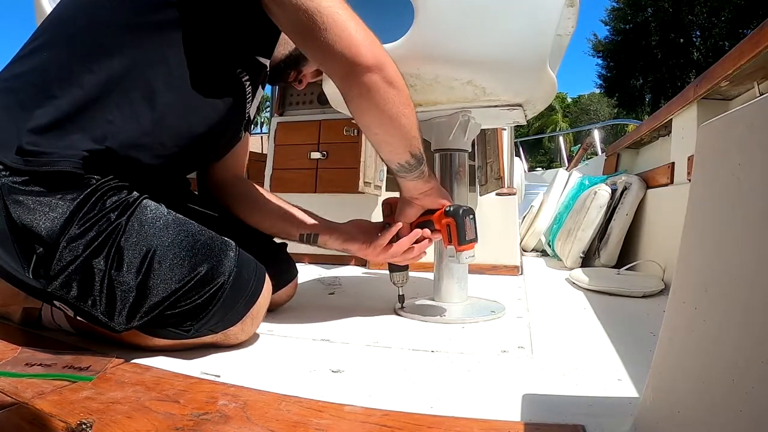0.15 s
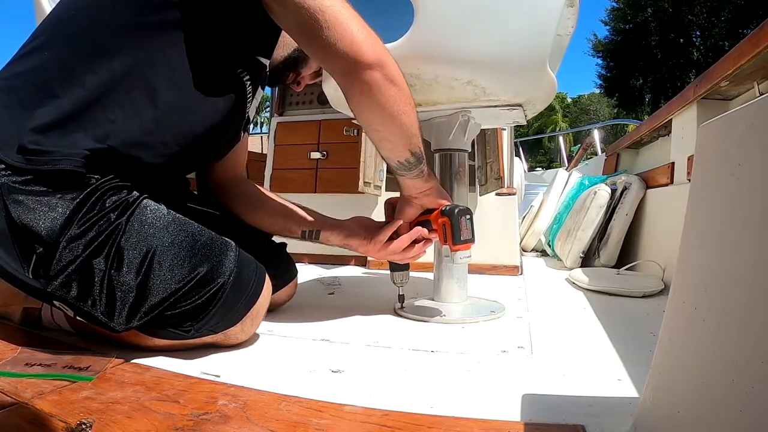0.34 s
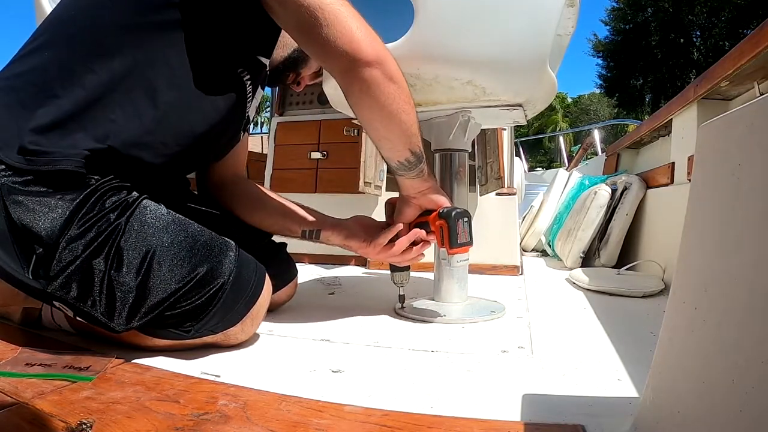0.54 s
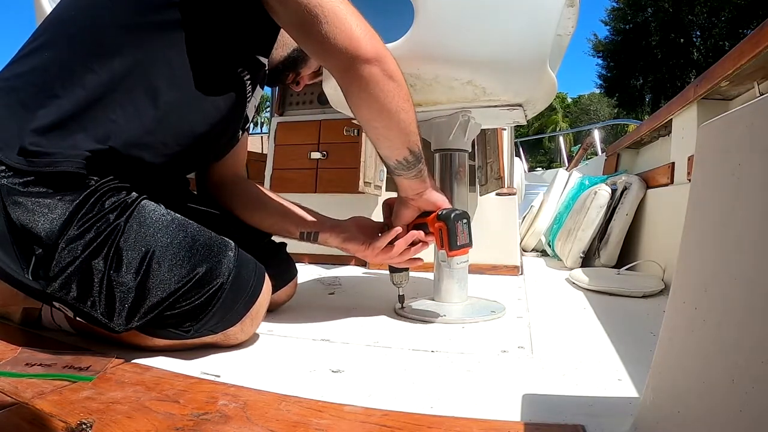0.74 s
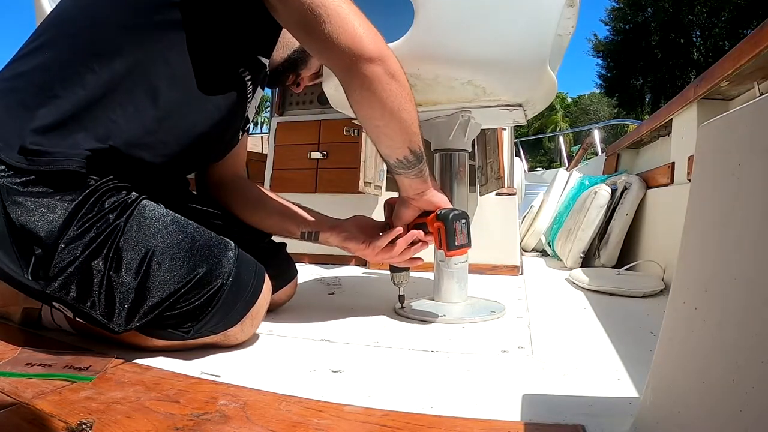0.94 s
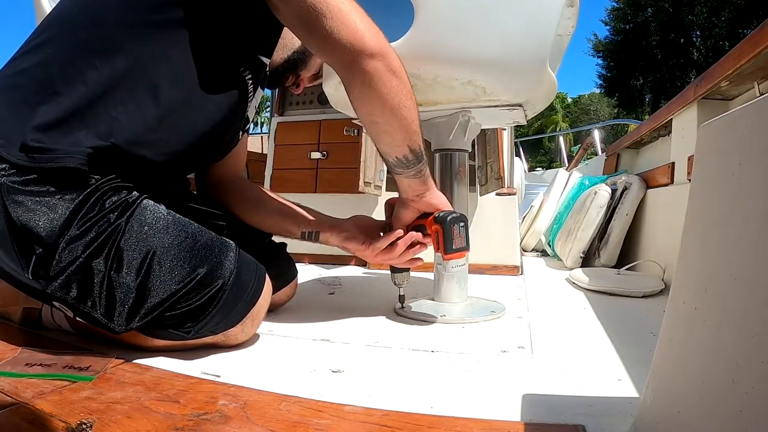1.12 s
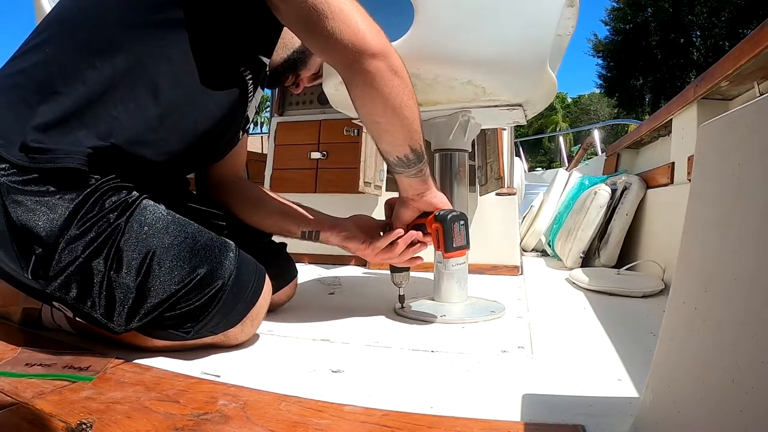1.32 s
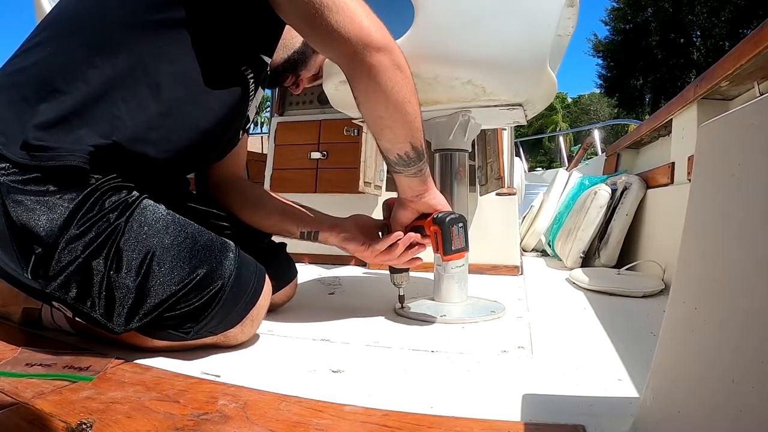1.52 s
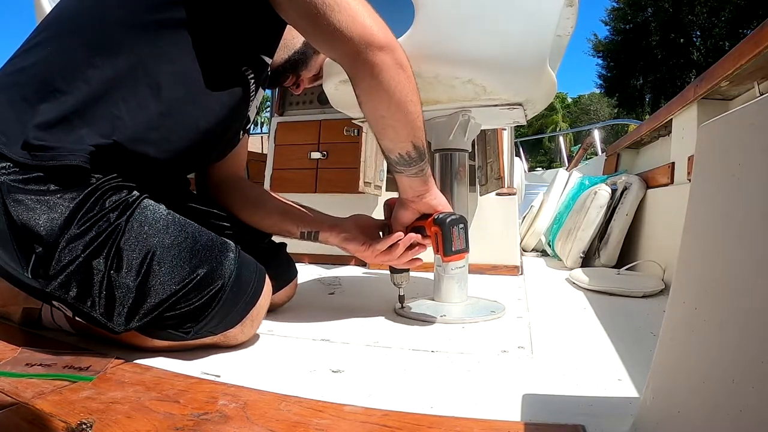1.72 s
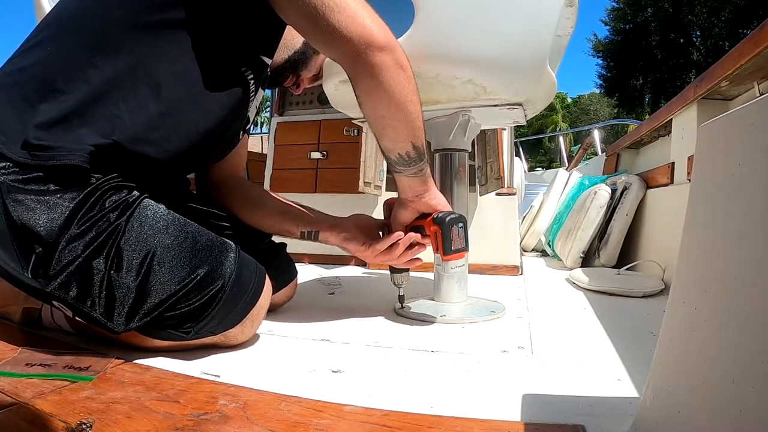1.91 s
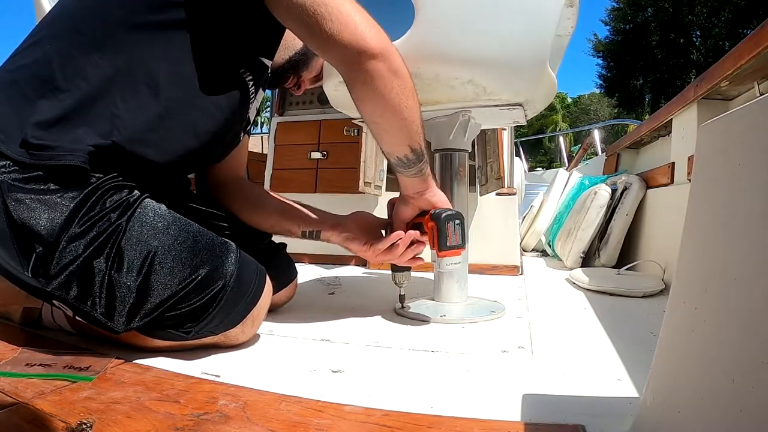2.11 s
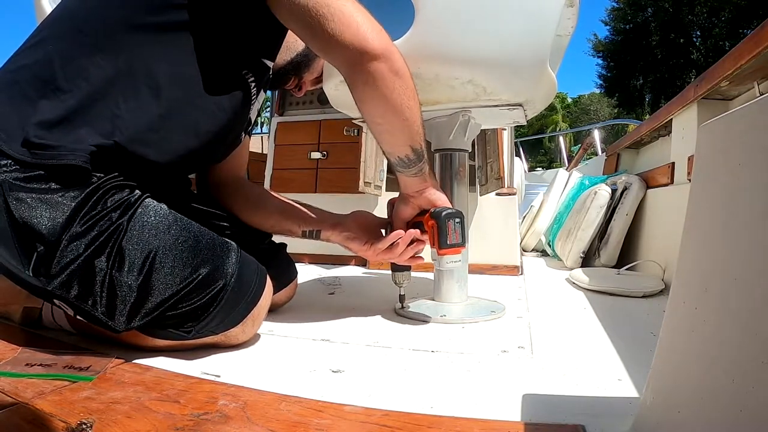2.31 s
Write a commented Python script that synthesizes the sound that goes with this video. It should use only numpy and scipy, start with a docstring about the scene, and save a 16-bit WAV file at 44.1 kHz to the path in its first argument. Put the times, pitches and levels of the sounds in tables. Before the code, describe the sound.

Close stereo pickup on an open boat deck: faint trigger clicks, a short harsh drill burst, a brief gap with clicks, then a longer steady grinding burst, ending in short echo and quiet low rumble.

```python
"""On a boat deck by the cockpit, a cordless drill runs on screws close by: a short burst, then a long one.
The trigger clicks and the motor whines as the first burst starts; the bit catches eight times a turn.
Each catch is a noise scrape; spindle partials and plate resonances make the deck boom, growl and ring.
Deck modes hum on after each stop, decaying noise echoes in the cockpit, and low noise rumbles outdoors."""
import sys
import numpy as np
from scipy import signal
from scipy.fft import rfft, irfft, next_fast_len
from scipy.io import wavfile
from scipy.ndimage import uniform_filter1d, map_coordinates

SR = 44100
rng = np.random.default_rng(int(sys.argv[2]) if len(sys.argv) > 2 else 0)


def put_to_file(sound):
    """Save the sound as 16-bit audio at rate SR, in the file named by the first command-line argument."""
    columns = np.atleast_2d(sound).T  # one column per channel
    safe = np.clip(columns, -1, 1)
    whole_steps = np.round(safe * 32767)
    wavfile.write(sys.argv[1], SR, whole_steps.astype(np.int16))


N = 103635


def amp(db):
    """Level: decibels as an amplitude ratio."""
    return 10 ** (np.asarray(db) / 20)


def unit(x):
    """Normalisation: scale to rms 1."""
    return x / np.sqrt(np.mean(x ** 2) + 1e-20)


def clock():
    """Sampling: the time of each sample in seconds."""
    return np.arange(N) / SR


def along(points, hz):
    """Logarithmic frequency scale: interpolate (Hz, value) points at hz."""
    f, v = np.transpose(points)
    return np.interp(np.log(hz + 1), np.log(f + 1), v)


def over_time(points):
    """Slow control: interpolate (second, value) points at each sample."""
    return np.interp(clock(), *np.transpose(points))


def wobble(rate):
    """Random modulation: a smooth curve through random knots, rate knots a second."""
    return map_coordinates(rng.standard_normal(400), [clock() * rate], mode="wrap")


def filtered(x, response):
    """Linear filtering: multiply the spectrum of x by a complex response of frequency."""
    m = next_fast_len(N + SR // 2)
    spectrum = rfft(x, m) * response(np.fft.rfftfreq(m, 1 / SR))
    return irfft(spectrum, m)[..., :N]


def coloured(x, spectrum):
    """Minimum phase: a causal filter of unit power gain, its shape found by folding the cepstrum."""
    size = 2 ** 13
    cepstrum = irfft(np.log(amp(along(spectrum, np.fft.rfftfreq(size, 1 / SR)))))
    cepstrum[1:size // 2] *= 2
    cepstrum[size // 2 + 1:] = 0
    impulse_response = irfft(np.exp(rfft(cepstrum)))
    impulse_response /= np.linalg.norm(impulse_response)
    return signal.fftconvolve(x, impulse_response[None], axes=1)[:, :N]


def white():
    """White noise: two unrelated signals of equal power at every frequency."""
    return rng.standard_normal((2, N))


# Coherence of left and right. Each row: frequency in Hz, likeness from 0 to 1.
COHERENCE = [(25, .85), (60, 0.99), (250, 0.92), (500, 0.76), (1000, 0.63), (2000, 0.64), (4000, 0.66),
             (8000, 0.2), (14000, 0.13)]


def spread(pair):
    """Coherence: mix two unrelated signals to be alike in the bass and less so in the treble."""
    def mid_side(hz):
        turn = np.arccos(np.clip(along(COHERENCE, hz), 0, 1)) / 2
        return np.array([np.cos(turn), np.sin(turn)])
    mid, side = filtered(pair, mid_side)
    return np.array([mid + side, mid - side])


def noise(spectrum):
    """Filtered noise: a stereo pair of rms 1 with the given spectrum."""
    return unit(spread(coloured(white(), spectrum)))


def resonances(modes, hz):
    """Modal sum: damped resonances of (Hz, width Hz, dB) with alternating sign."""
    total = 0
    for k, (centre, width, db) in enumerate(modes):
        damping = 1j * hz * width
        total = total + (-1) ** k * amp(db) * damping / (centre * centre - hz * hz + damping)
    return total


# Catches of the bit in one turn. Each row: share of the turn, relative level in dB at first,
# relative level in dB from DEEP_TURNS on.
CATCHES = [(0, -13, -11), (0.116, -19, -12.5), (0.237, -17.5, -11.5), (0.317, -10, -11.5),
           (0.441, -23.5, -25.5), (0.556, -14, -14), (0.669, -11, -13), (0.902, -16.5, -19.5)]
DEEP_TURNS, CATCH_JITTER_S = 9, .00008


def catches(turns):
    """Periodic excitation: an uneven impulse per catch; the pattern shifts once the screw is deep."""
    place, early_db, deep_db = np.transpose(CATCHES)
    places = np.arange(-30, 40)[:, None] + place
    s = np.interp(places, turns, clock(), left=-1, right=-1)
    s = s + CATCH_JITTER_S * rng.standard_normal(places.shape)
    db = np.where(places < DEEP_TURNS, early_db, deep_db)
    size = amp(db + rng.uniform(-1.95, 1.3, places.shape))
    heard = s > 0
    return np.bincount((s[heard] * SR).astype(int), size[heard], N)[:N]


# Spectrum of the bit and chuck rattling. Each row: frequency in Hz, relative level in dB per Hz.
RATTLE_SPECTRUM = [(500, -16), (1000, -2), (1500, -1), (1720, -1), (1900, -6), (2150, 2), (2350, -4),
                   (2560, 0), (3400, -4), (3850, 0), (4400, -6), (5600, -3.5), (6500, -7.5), (7800, -15),
                   (8700, -9), (10500, -18), (12500, -25), (15700, -44.5)]
CRACK_ATTACK_S, SCRAPE_HOLD_S, CRACK_T60_S = .0005, .002, .009
RATTLE_T60_S, RATTLE_TAIL_DB = .04, -14  # tail level relative to the crack
GRIND_DB, GRIND_TOP_HZ = -17, 7500  # grinding, before the rattle is normalised
RATTLE_PATCHY_DB = 1.5


def rattle(hits):
    """Impact noise: each catch is a scrape with a metallic tail and patchy colour, over steady grinding."""
    t = clock()[:SR // 10]
    crack = amp(-60 * np.maximum(t - SCRAPE_HOLD_S, 0) / CRACK_T60_S)
    tail = amp(RATTLE_TAIL_DB - 60 * t / RATTLE_T60_S)
    attack = 1 - np.exp(-t / CRACK_ATTACK_S)
    power = (crack ** 2 + tail ** 2) * attack ** 2
    # unrelated noises add in power
    envelope = np.sqrt(abs(signal.fftconvolve(hits ** 2, power)[:N]))
    grind = amp(GRIND_DB) * filtered(white(), lambda hz: 1 / np.sqrt(1 + (hz / GRIND_TOP_HZ) ** 4))
    z = signal.stft(white(), nperseg=256)[2]
    # patches of frequency and time, louder or softer
    patches = uniform_filter1d(rng.standard_normal(z.shape[1:]), size=12, axis=0)
    patches = uniform_filter1d(patches, size=4, axis=1)
    grit = signal.istft(z * amp(RATTLE_PATCHY_DB * unit(patches)), nperseg=256)[1][:, :N]
    return spread(coloured(grit * envelope + grind, RATTLE_SPECTRUM))


# Force on the deck. Each row: multiple of the spindle speed, relative level in dB.
ORDERS = [(3, -2), (4, -9.5), (5, -17.5), (6, 0.5), (7, -4), (9, 0.5), (10, -0.5), (12, -1), (13, -3),
          (14, 0.5), (15, 3.5), (16, -6.5), (18, 4), (19, -6), (20, -7.5), (21, 3.5), (24, -4.5), (27, -5),
          (28, -5), (30, -2.5), (33, -5.5)]
# Partials between every third, chiefly a hum near 146 Hz. Each row: time in seconds, added level in dB.
UNEVEN = [(.28, -4), (.45, 2.5), (1.02, -5.5), (1.08, 2), (1.5, 2), (1.57, -7.5), (1.66, 2), (1.78, -11.5),
          (1.87, 1), (1.93, -3.5), (1.985, 5), (2.05, -1.5)]
ORDER_WAVER_DB, ORDER_DRIFT_RAD, LOOSE_DRIFT_RAD = 1.6, .024, .2


def drone(turns):
    """Harmonic series: spindle partials drift more the higher they are; those between thirds come and go."""
    uneven_db = over_time(UNEVEN)
    force = np.zeros(N)
    for k, db in ORDERS:
        between = k % 3 > 0
        drift = between * LOOSE_DRIFT_RAD + k * ORDER_DRIFT_RAD
        level = amp(db + between * uneven_db + ORDER_WAVER_DB * wobble(5.01))
        phase = 2 * np.pi * (k * turns + rng.random()) + drift * wobble(13)
        force = force + level * np.sin(phase)
    return force


# Resonances of the deck plate. Each row: frequency in Hz, width in Hz, relative level in dB.
PLATE = [(815, 9.2, -5), (918, 36, -0.5), (1033.7, 14, 5.5), (1138, 70, 3.5), (1218.5, 64, 6),
         (1325, 39, 4)]


def plate(hz):
    """Plate resonance: the response of the ringing deck plate."""
    return resonances(PLATE, hz)


# How the hollow below the deck passes the force on. Each row: frequency in Hz, relative level in dB.
BOOM_BODY = [(30, -56), (50, -25.5), (62, -31), (83, -3), (104, 0), (117, 2), (126, -1), (146, 3.5),
             (177, -1.5), (188, -7.5), (215, -15), (320, -42.5)]
# How the deck panels pass the force on. Each row: frequency in Hz, relative level in dB.
GROWL_BODY = [(140, -19.5), (240, -13), (313, -4), (355, -0.5), (378, -7.5), (415, 0), (440, -3.5),
              (500, -3.5), (620, -5), (760, -3.5), (950, -21), (1400, -31.5)]
BOOM_NOISE_DB, GROWL_NOISE_DB, RING_NOISE_DB = -12.5, -7.5, -6.5  # roughness in each layer
RATTLE_DB, BOOM_DB, GROWL_DB, RING_DB = 1, -0.5, -1.5, -3  # trims added to the level tables
RISE_S, FADE_S = .004, .014  # time constants before and after a burst


def burst(speed, levels, turn_zero_s):
    """Forced vibration: the turning spindle drives the rattle and the deck's boom, growl and ring."""
    t = clock()
    turns = np.cumsum(over_time(speed)) / SR
    turns = turns - np.interp(turn_zero_s, t, turns)
    s, *columns = np.transpose(levels)
    outside = np.maximum(s[0] - t, 0) / RISE_S + np.maximum(t - s[-1], 0) / FADE_S
    treble, boom, growl, ring = [amp(np.interp(t, s, c)) * np.exp(-outside) for c in columns]

    def running(x):  # rms 1 within the burst
        return x / np.sqrt(np.mean(x[..., outside == 0] ** 2))

    hits, force = catches(turns), drone(turns)

    def deck(body, rough_db):
        tone = running(filtered(force, lambda hz: amp(along(body, hz))))
        return running(tone + amp(rough_db) * noise(body))

    struck_plate = amp(RING_DB) * running(filtered(hits, plate))
    rough_plate = amp(RING_NOISE_DB) * unit(spread(filtered(white(), plate)))
    return (treble * amp(RATTLE_DB) * running(rattle(hits))
            + boom * amp(BOOM_DB) * deck(BOOM_BODY, BOOM_NOISE_DB)
            + growl * amp(GROWL_DB) * deck(GROWL_BODY, GROWL_NOISE_DB)
            + ring * (struck_plate + rough_plate))


# Spindle speed in the two bursts. Each row: time in seconds, speed in turns a second.
SPEED_SHORT = [(.19, 5), (.26, 15.5), (.35, 17.9), (.42, 19.5), (.46, 19.9), (.55, 19.6), (.6, 15)]
SPEED_LONG = [(.78, 7), (.832, 12), (.88, 16.4), (.935, 18.9), (1.022, 19.9), (1.074, 20.33),
              (1.224, 20.73), (1.302, 20.87), (1.534, 20.97), (1.614, 20.87), (1.82, 20.97), (1.98, 20.75),
              (2.02, 19.5), (2.06, 14)]
# Levels before the trims. Each row: time in seconds, then rattle, deck boom, deck growl and deck ring in dB.
LEVEL_SHORT = [(0.168, -76.5, -42, -38.5, -47.5), (0.222, -42.5, -42, -39, -39.5),
               (.255, -25.5, -16.5, -27.5, -32), (.3, -23, -21.5, -20.5, -31),
               (0.359, -24.5, -17, -20.5, -24.5), (.46, -24.5, -14.5, -23, -23.5),
               (0.544, -25.5, -21.5, -21.5, -28.5), (.59, -29, -14.5, -26.5, -38),
               (0.613, -48.5, -41.5, -62.5, -48)]
LEVEL_LONG = [(.79, -42, -49, -35.5, -52), (.816, -34.5, -29, -32, -30), (.852, -26.5, -21.5, -24, -30.5),
              (.94, -25, -15.5, -20.5, -34.5), (.99, -24, -23.5, -21.5, -30), (1.1, -24, -20.5, -22.5, -28),
              (1.42, -23, -21, -23.5, -25), (1.54, -23, -17, -23.5, -29), (1.699, -24.5, -16.5, -25, -23),
              (1.99, -23.5, -17.5, -25.5, -25.5), (2.045, -33.5, -19, -27.5, -30.5),
              (2.075, -49.5, -30.5, -42.5, -61.5)]
# The moment in each burst from which turns are counted, in seconds.
TURN_ZERO_S = [.4334, 1.0627]


def drilling():
    """Superposition: two pulls of the trigger, one short and one long."""
    short = burst(SPEED_SHORT, LEVEL_SHORT, TURN_ZERO_S[0])
    return short + burst(SPEED_LONG, LEVEL_LONG, TURN_ZERO_S[1])


# The gears whirr as the motor speeds up. Each row: peak in seconds, level in dB,
# Gaussian rise in seconds, Gaussian fall in seconds.
SPIN_UPS = [(0.277, -23.5, 0.035, 0.061), (0.828, -28, 0.019, 0.069)]
# Spectrum of the gears. Each row: frequency in Hz, relative level in dB per Hz.
GEAR_SPECTRUM = [(200, -47), (600, 9.5), (900, -13), (1300, 3.5), (2000, 4), (2600, 5.5), (3300, 1.5),
                 (4300, -17.5), (8000, -16.5), (15000, -44.5)]
WHINE_START_S, WHINE_HOLD_S, WHINE_RISE_S, WHINE_FALL_S = .184, .036, .002, .003
WHINE_HZ, WHINE_DB = 3871, -35  # level about which the whine wavers


def motor():
    """Magnetic excitation: one brief whine on chopped current; gear noise swells at each spin-up."""
    t = clock()
    age = t - WHINE_START_S
    fall = np.exp(-np.maximum(age - WHINE_HOLD_S, 0) / WHINE_FALL_S)
    held = np.clip(age / WHINE_RISE_S, 0, 1) * fall
    tone = np.sqrt(2) * np.sin(2 * np.pi * WHINE_HZ * t)
    whine = amp(WHINE_DB + wobble(90)) * held * tone
    swell = np.zeros(N)
    for peak_s, db, rise_s, fall_s in SPIN_UPS:
        width = np.where(t < peak_s, rise_s, fall_s)
        swell = swell + amp(db) * np.exp(-((t - peak_s) / width) ** 2 / 2)
    return whine + swell * noise(GEAR_SPECTRUM)


def taps(rows, spectrum):
    """Transient contact: coloured noise starts at once and decays exponentially."""
    t = clock()
    envelope = sum((t >= s) * amp(db - 60 * np.maximum(t - s, 0) / t60) for s, db, t60 in rows)
    return spread(coloured(white() * envelope, spectrum))


# Clicks of the trigger and the bit seating. Each row: start in seconds, level in dB, T60 in seconds.
CLICKS = [(.098, -56, .05), (.121, -58, .07), (.1555, -51.5, .06), (.169, -46.5, .05), (.756, -52, .05),
          (.7648, -37.5, .026), (.7825, -38, .03)]
# Spectrum of a click. Each row: frequency in Hz, relative level in dB per Hz.
CLICK_SPECTRUM = [(150, -23), (500, 1), (1300, -4.5), (2500, -5), (4000, -1), (6000, -9.5), (7600, -21),
                  (9000, -16.5), (15000, -46.5)]


def clicks():
    """Light impact: the trigger and the seating bit click."""
    return taps(CLICKS, CLICK_SPECTRUM)


# The bit takes up the load or lets go. Each row: start in seconds, level in dB, T60 in seconds.
KNOCKS = [(.2593, -14.5, 0.029), (.286, -18, .024), (.434, -22, 0.027), (.4675, -24, 0.042),
          (.5015, -22, 0.054), (.5346, -16.5, 0.034), (.581, -23.5, 0.031), (.8178, -19.5, 0.022),
          (.846, -22.5, 0.044), (.8687, -18, 0.036), (.927, -20.5, 0.027), (.9445, -32.5, 0.017),
          (1.031, -20.5, 0.03), (1.507, -24, 0.015), (1.651, -21, 0.034), (2.025, -18, 0.033),
          (2.048, -23.5, 0.032)]


def knocks():
    """Hard impact: the bit knocks with the same spectrum as its rattle."""
    return taps(KNOCKS, RATTLE_SPECTRUM)


# Modes of the hollow under the deck. Each row: frequency in Hz, width in Hz, relative level in dB.
HOLLOW = [(161.4, 6, -5), (206, 5.5, -11.5), (250.4, 2.4, 1.5)]


def hollow(drill):
    """Cavity resonance: narrow modes under the deck store the drill's energy and hum on after each stop."""
    return filtered(drill, lambda hz: resonances(HOLLOW, hz))


# Decay of the cockpit. Each row: frequency in Hz, T60 in seconds.
COCKPIT_T60 = [(100, 0.66), (300, 0.29), (1200, 0.19), (4000, 0.2), (12000, 0.21)]
COCKPIT_BASS_DB, COCKPIT_DB = -16.5, -12  # below 200 Hz and above 600 Hz


def cockpit(x):
    """Reverberation: decaying noise stands for the deck and walls; the bass lasts longest."""
    hz, t, z = signal.stft(rng.standard_normal((2, SR // 2)), SR, nperseg=256)
    decay = amp(-60 * t / along(COCKPIT_T60, hz)[:, None])
    tail = signal.istft(z * decay, SR, nperseg=256)[1]
    wet = signal.fftconvolve(x, tail / np.linalg.norm(tail[0]), axes=1)[:, :N]
    gains = [(200, COCKPIT_BASS_DB), (600, COCKPIT_DB)]
    return spread(filtered(wet, lambda f: amp(along(gains, f))))


# Spectrum of the outdoor rumble. Each row: frequency in Hz, relative level in dB per Hz.
RUMBLE_SPECTRUM = [(20, -21), (35, -7.5), (55, 12.5), (85, 2), (135, 3), (200, -3.5), (320, -9), (450, -18),
                   (800, -28.5), (1150, -21.5), (2000, -36), (5000, -41.5), (15000, -57)]
# Level of the rumble as picked up, probably lowered by gain control. Each row: time in seconds, level in dB.
PICKED_UP_RUMBLE_LEVEL = [(0, -41), (.7, -43), (2.3, -46)]


def rumble():
    """Ambient noise: a low outdoor rumble, its picked-up level falling slowly, probably by gain control."""
    return amp(over_time(PICKED_UP_RUMBLE_LEVEL)) * noise(RUMBLE_SPECTRUM)


# Balance of the two microphones. Each row: frequency in Hz, left minus right in dB.
LEAN = [(60, 0.5), (120, 2.0), (240, 3.5), (480, 2), (950, -0.5), (1890, 3), (3770, 2.5), (7520, 0),
        (15000, -5.5)]
LEFT_LAG_S = .000056


def microphones(air):
    """Interchannel difference: left and right differ in level by frequency, and left arrives late."""
    sides = np.array([[1], [-1]]) / 2

    def response(hz):
        return amp(sides * along(LEAN, hz)) * np.exp(-2j * np.pi * hz * sides * LEFT_LAG_S)
    return filtered(air, response)


def scene():
    """Superposition: the drill, the hollow under it, its echo and the rumble at two microphones."""
    drill = drilling() + motor() + clicks() + knocks()
    return microphones(drill + hollow(drill) + cockpit(drill) + rumble())


TOP_HZ, TOP_EDGE_HZ = 15750, 1000  # upper limit and width of the slope below it


def record(dry):
    """Band limiting: the gain slopes to nothing at the upper limit."""
    return filtered(dry, lambda hz: np.clip((TOP_HZ - hz) / TOP_EDGE_HZ, 0, 1))


dry = scene()
out = record(dry)
put_to_file(out)
```